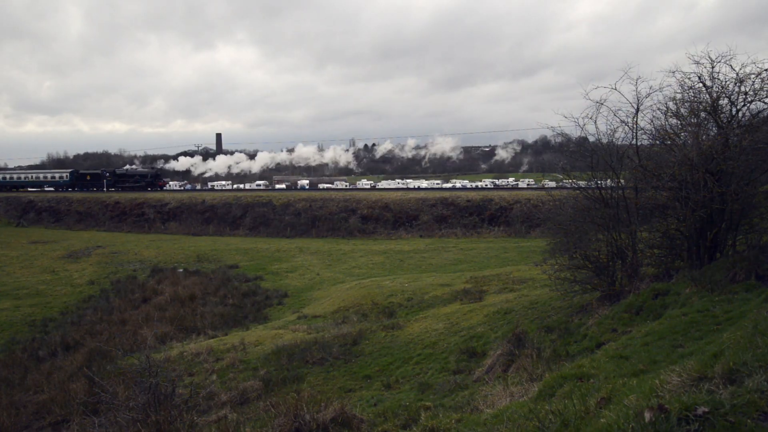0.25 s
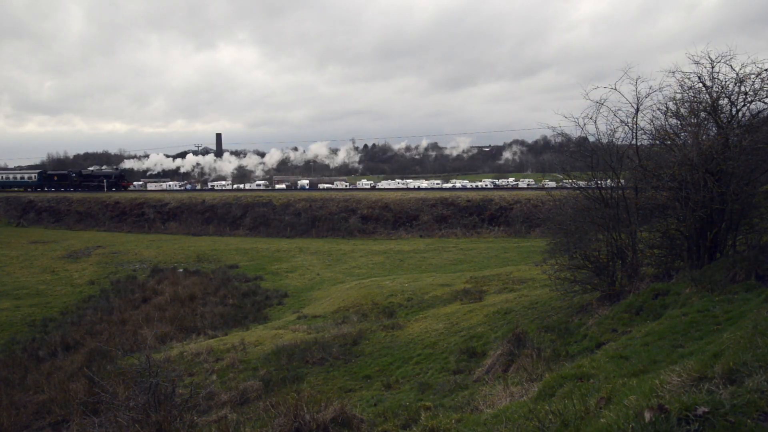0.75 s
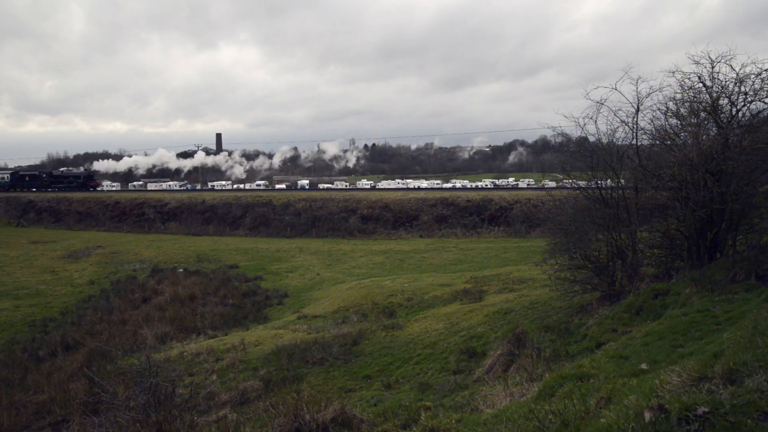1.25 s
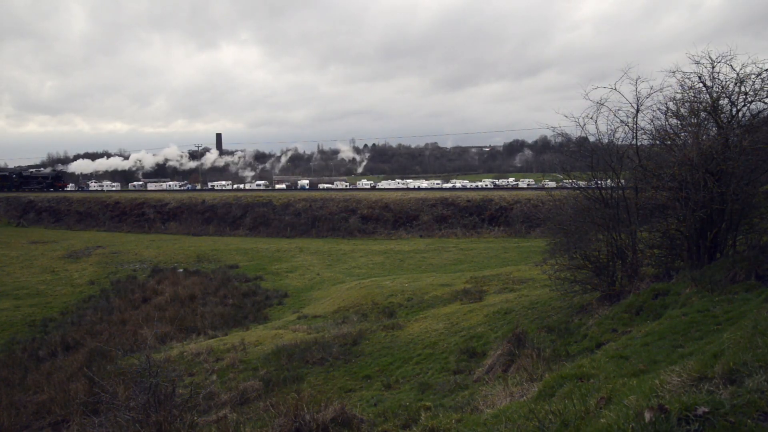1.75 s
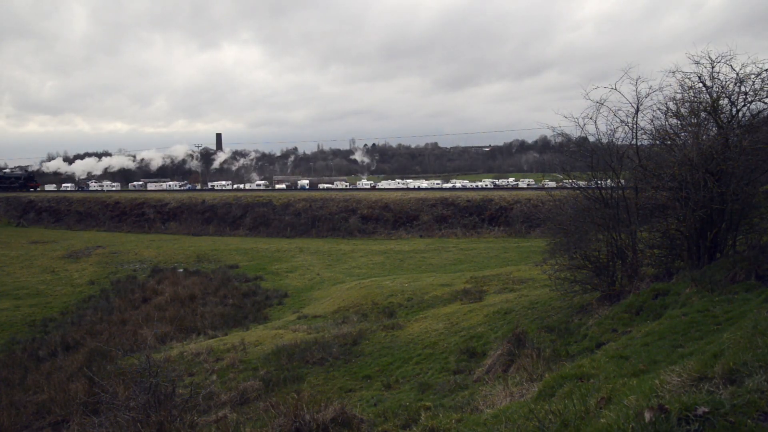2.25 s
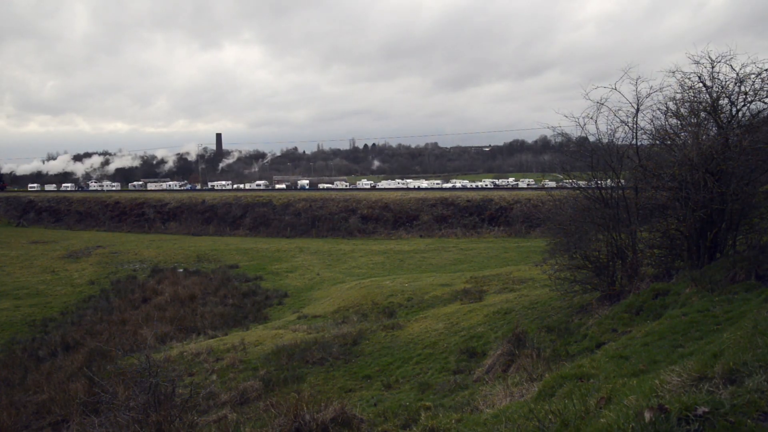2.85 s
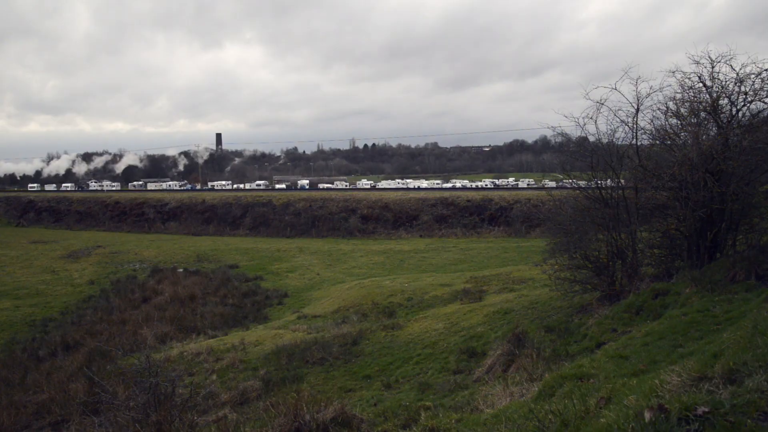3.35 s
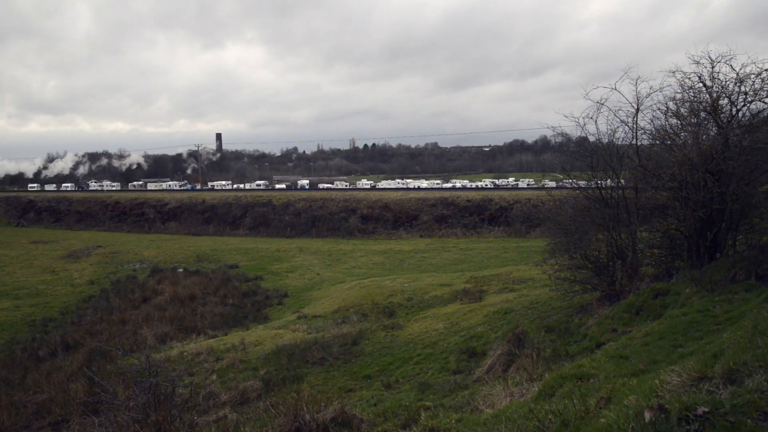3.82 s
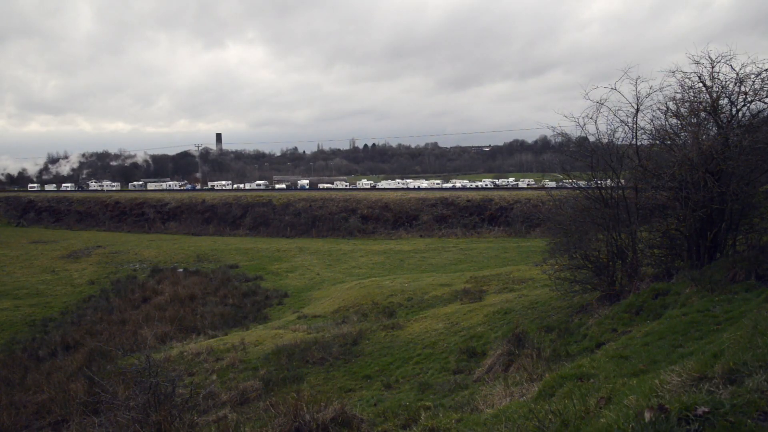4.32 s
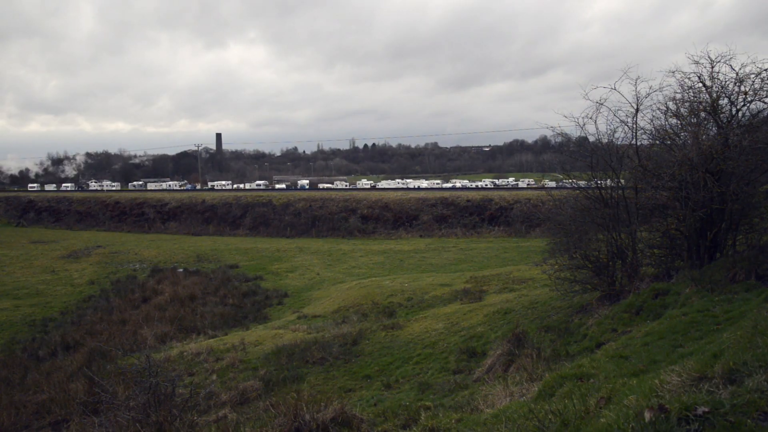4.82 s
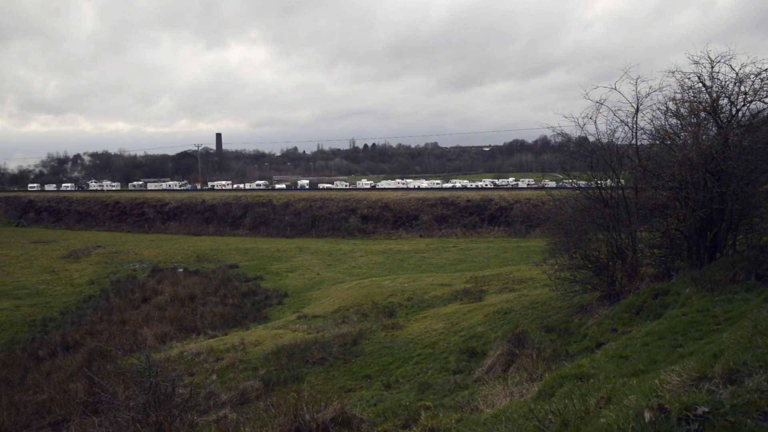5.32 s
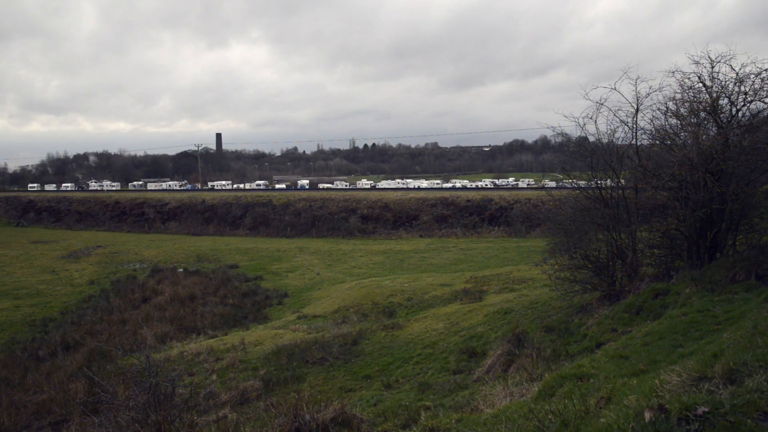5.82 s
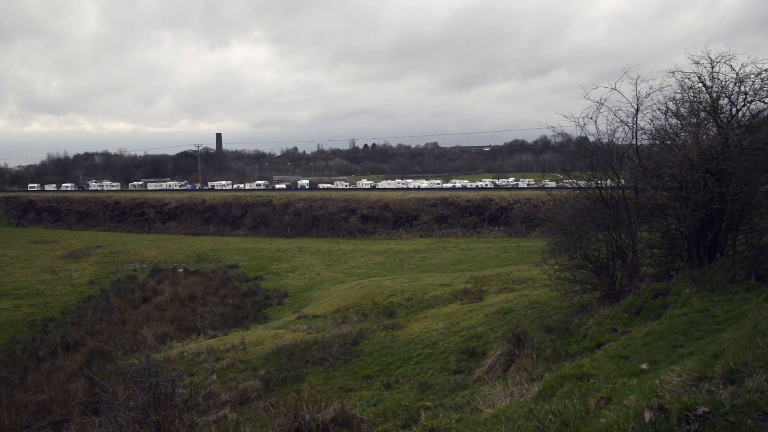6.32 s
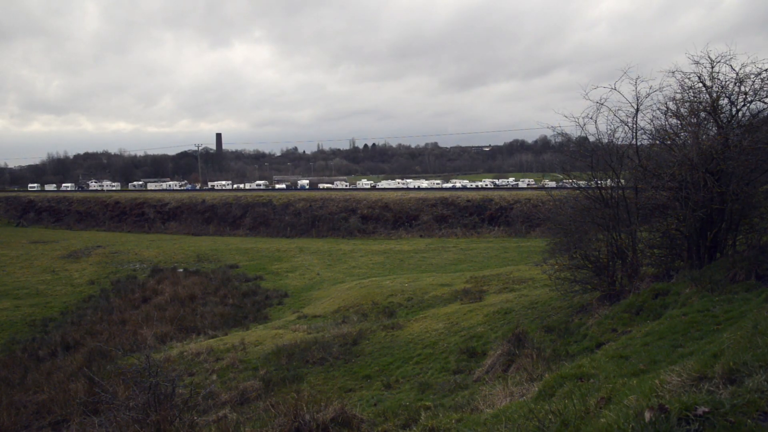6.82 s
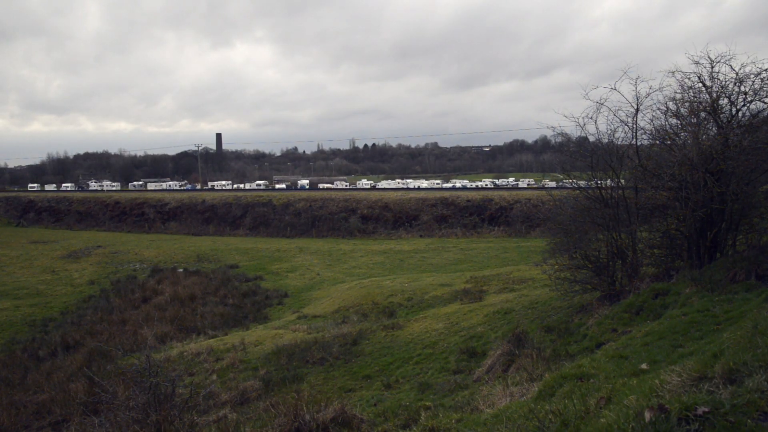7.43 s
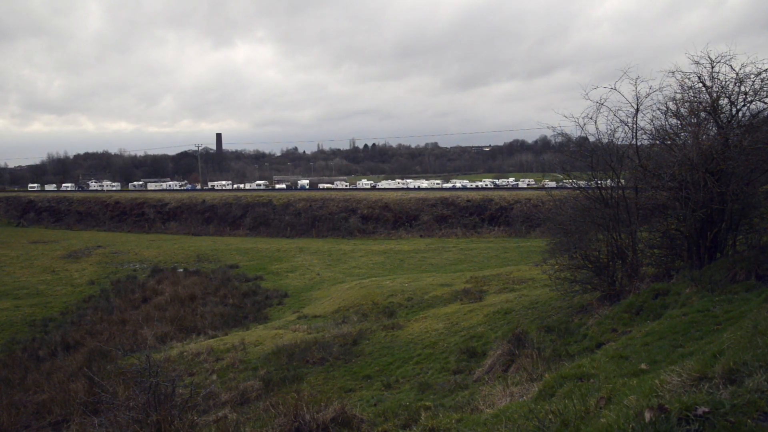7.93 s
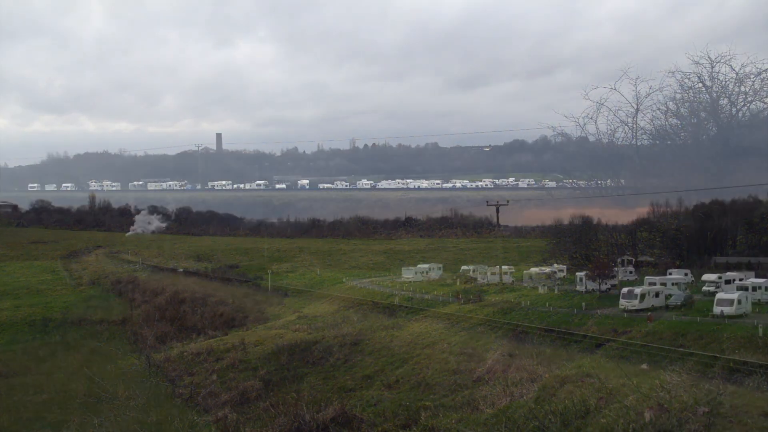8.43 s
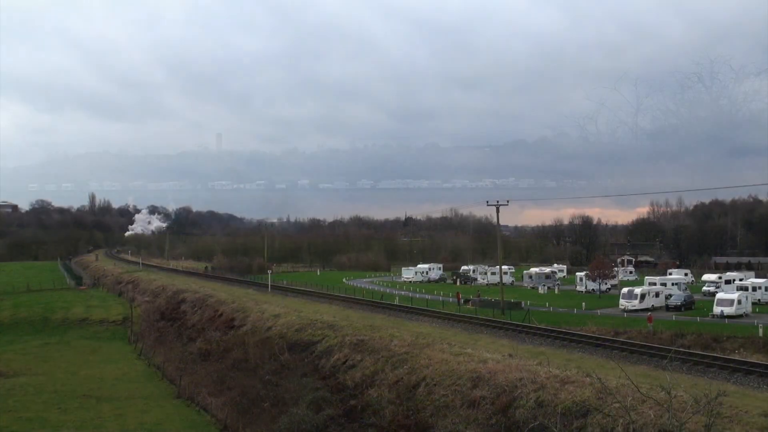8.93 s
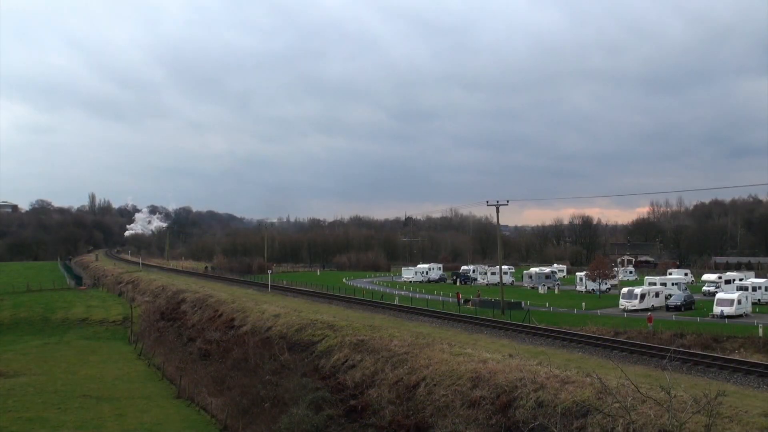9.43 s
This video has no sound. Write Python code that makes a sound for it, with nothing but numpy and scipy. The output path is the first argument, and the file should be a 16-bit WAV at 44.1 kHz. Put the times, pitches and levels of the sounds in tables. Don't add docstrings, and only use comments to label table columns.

```python
import sys
import numpy as np
from scipy import signal
from scipy.fft import rfft, irfft, next_fast_len
from scipy.io import wavfile
from scipy.ndimage import uniform_filter1d

SR = 44100
rng = np.random.default_rng(int(sys.argv[2]) if len(sys.argv) > 2 else 0)


def inscribe(sig):
    pcm = np.round(np.clip(np.atleast_2d(sig).T, -1, 1) * 32767)
    wavfile.write(sys.argv[1], SR, pcm.astype(np.int16))


def invert_db(level):
    return 10 ** (np.asarray(level, dtype=float) / 20)


N = 426447
T = np.arange(N) / SR

# (time [s], level [dB])
GAIN_CURVE = [(0.0, -1), (0.4, 2.5), (1.04, 1.5), (1.42, 2), (1.93, 6.5), (2.35, 8), (2.81, 5.5),
              (3.96, 9.5), (4.34, 8.5), (4.74, 12), (5.19, 6.5), (5.6, 10), (5.85, 1), (6.21, 6),
              (6.55, 9.5), (7.1, -1), (7.69, 11.5), (8.5, 12.5)]
ROAR_DB, RECEDE_DB_PER_S = -23.5, 1.96
WARM_DB, WARM_DB_PER_S = -7.5, 0.3456
HISS_DB, HISS_FOLLOW = -74.5, 0.91
CUT_S, CUT_LENGTH_S, CUT_DB, CUT_WARM_DB, CUT_HISS_DB = 8.498, 0.56, -37.5, 17, -32

# (frequency [Hz], density [dB per Hz])
ROAR_SPECTRUM = [(35, -22.5), (60, 8.5), (189, -3), (322, -12.5), (363, -5.5), (400, -29.5), (433, -7),
                 (528, -8.5), (583, -0.5), (849, -5), (1540, -9), (1950, -6.5), (4470, -21.5), (5030, -22),
                 (6770, -39.5), (8800, -67), (14900, -120)]
# (frequency [Hz], width [Hz], level [dB], time its coach is heard best [s])
WHEEL_MODES = [(827, 130, -7.5, 1.2), (980, 80, -10, 2.5), (1170, 31, -17, 6.6), (1331, 90, -13, 1),
               (1945, 80, -15.5, 3.7), (2647, 570, -13.5, 3.1), (3543, 250, -19, 2.9),
               (5410, 1230, -20.5, 0.85)]
# (time [s], blow level [dB], ring frequency [Hz])
DULL_CHUFFS = [(0.1176, -2.5, 1386), (0.6081, -5, 1970), (1.0701, -11, 970), (1.3277, -6.5, 1940),
               (1.9489, -7, 810), (2.1194, -3.5, 830), (2.4575, -2, 1290), (2.6974, -0.5, 1875),
               (2.8554, -1, 1920), (3.014, -4, 1890), (3.249, 1, 1010), (3.4153, -1.5, 910),
               (3.5682, -3.5, 1855), (3.6915, -2, 1990), (3.73, -24, 706), (3.8286, -0.5, 1664),
               (4.9145, -11, 1640), (5.3986, -8.5, 1157), (6.828, -15.5, 760), (7.6923, -10.5, 1750)]
# (time [s], blow level [dB], ring frequency [Hz], ring re blow [dB])
RINGING_CHUFFS = [(0.1504, -7.5, 846, 0), (0.3042, -11, 700, 2), (0.4579, -9, 840, 1), (0.6865, -6, 800, 0),
                  (0.848, -8.5, 690, 5), (0.9945, -13, 820, -1), (1.109, -7, 764, -1.5),
                  (1.2457, -6.5, 782, 0.5), (1.4833, -6.5, 930, -9), (2.2817, -1, 1470, -10),
                  (2.5475, -6, 685, -2.5), (2.7387, -10.5, 1330, 3.5), (3.5278, -6, 1066, -5),
                  (3.949, -7.5, 1220, -4.5), (4.0606, -10.5, 1000, -0.5), (4.1486, -4.5, 1360, -0.5),
                  (4.6878, -5, 920, -2.5), (5.1449, -8, 1270, 0.5), (5.5665, -5.5, 1004, -6),
                  (5.7322, -15.5, 1016, 1.5), (5.9768, -19.5, 900, 6), (6.151, -16.5, 873, 3.5),
                  (6.1998, -22, 853, 6), (6.3065, -16, 996, -0.5), (6.4295, -13, 1013, 5.5),
                  (6.578, -14.5, 1010, 6), (7.893, -8, 1170, -6.5), (8.1412, -10.5, 1180, -2),
                  (8.31, -17, 2085, 1.5), (8.4885, -14.5, 1170, -5.5)]
KNOCK_RING_DB, KNOCK_RISE_MS, CLACK_RISE_MS = -12.5, 2, 2.6
BLUR_MS_PER_S = 0.45

# (crest time [s], half length [s], level [dB], small fast eddies re slow [dB])
GUST_EVENTS = [(0.416, 0.073, -18, -7), (0.247, 0.081, -19, -15), (0.697, 0.028, -21, -12),
               (.89, 0.078, -25.5, 3.5), (1.044, 0.03, -18.5, -3), (1.485, 0.11, -19.5, -5.5),
               (1.9, .3, -29, -6), (2.898, .02, -17.5, -26), (3.262, 0.075, -19, -13),
               (4.334, 0.073, -15.5, -26), (4.8, 0.02, -10, -5), (5.07, 0.26, -17.5, -5.5),
               (5.37, 0.048, -16, -13), (5.508, 0.034, -15.5, -27), (5.658, 0.077, -11, -9),
               (5.827, 0.074, -14, 2.5), (6.059, 0.024, -14, -4), (6.28, 0.069, -15.5, -2.5),
               (6.66, 0.077, -15.5, 1.5), (6.816, 0.1, -18, -24), (6.964, 0.063, -16, 1.5),
               (7.113, 0.031, -15, 1.5), (7.345, 0.13, -15, -5), (7.647, 0.075, -15, -18),
               (7.792, 0.13, -24, -21), (7.96, 0.019, -11.5, -10), (8.126, 0.056, -13, -15),
               (8.26, 0.021, -36, -19), (8.6, 0.053, -24, -3.5), (8.744, 0.027, -24, -3.5)]
LULL_DB, LULL_FAST_DB, SHELTER_S = -31, -30, 8.9
# (peak time [s], peak level [dB], frequency [Hz])
HARD_EDDIES = [(0.003, -9.5, 193), (0.41, -18, 245), (0.446, -7, 368), (0.894, -2, 390), (0.916, 2, 361),
               (1.43, -6, 290), (1.451, -3, 300), (3.199, -4, 200), (4.797, -8.5, 239), (4.906, -1.5, 420),
               (4.967, 0, 269), (4.974, -8, 414), (5.229, 1, 318), (5.248, -1.5, 450), (5.264, -3, 380),
               (5.292, -3.5, 366), (5.339, -7.5, 314), (5.37, 0.5, 356), (5.77, -1.5, 172), (5.979, 2, 380),
               (6.215, -4.5, 186), (6.48, -2, 320), (6.49, -2, 310), (6.829, -2.5, 178), (7.019, -3, 334),
               (7.26, -0.5, 269), (7.448, -1.5, 285), (8.154, -11.5, 251), (8.245, -5, 172),
               (8.625, -10, 300)]
# (peak time [s], peak level [dB], frequency [Hz], ducking [dB])
OVERLOAD_EDDIES = [(0.906, -6, 237, 12), (1.115, -2, 228, 3.5), (2.972, 0.5, 272, 11),
                   (3.257, -0.5, 318, 13.5), (4.786, -21.5, 234, 11.5), (5.171, -1.5, 280, 17.5),
                   (5.64, -13, 143, 11), (5.837, -7, 328, 10.5), (6.005, 1, 243, 6), (6.078, -5, 260, 8),
                   (6.337, 0.5, 292, 6), (6.659, 4.5, 420, 5.5), (6.697, 0, 383, 8.5),
                   (6.886, -4, 105, 7.5), (6.941, 2.5, 262, 0), (7.112, 2, 334, 0), (7.596, -3.5, 155, 5.5),
                   (8.561, -8, 186, 14), (8.74, -10, 307, 9)]

# (frequency [Hz], density [dB per Hz])
RUMBLE_SPECTRUM = [(12, -21.5), (22, 8), (38, -12.5), (55, 2), (90, -6.5), (130, -24.5), (180, -20),
                   (250, -37), (400, -44.5), (1000, -59), (4000, -93.5), (8800, -120)]
# (time [s], level [dB])
RUMBLE_CURVE = [(0.0, -23), (1.2, -33), (1.7, -27), (3.3, -38), (4.3, -30.5), (6.1, -27), (7.2, -35),
                (8.2, -23.5), (8.498, -17), (8.63, -9), (8.754, -10), (9.038, -1.5), (9.28, -2),
                (9.56, -5.5), (9.62, -1.5)]
RUMBLE_FOLLOW = 0.14

# (time [s], half length [s], level [dB])
HEDGE_GUSTS = [
    (0.44, 0.3, -50),
    (1.356, 0.1, -55),
    (2.4, 0.4, -61.5),
    (3.544, 0.15, -52),
    (4.673, 0.18, -52),
    (4.877, 0.11, -50.5),
    (6.602, .07, -55.5),
    (8.1, 0.3, -71.5),
]
# (time [s], frequency [Hz], level [dB])
BIRD_CHIRP = [
    (9.594, 3900, -61),
    (9.603, 4150, -69),
    (9.608, 4200, -63),
    (9.614, 3950, -67),
    (9.63, 3850, -76),
]


def evened(x):
    return x / np.sqrt(np.mean(x ** 2) + 1e-20)


def steadied(x, span):
    return x / np.sqrt(uniform_filter1d(uniform_filter1d(x ** 2, span), span))


def curves(rows):
    s, *columns = np.transpose(rows)
    return [np.interp(T, s, c) for c in columns]


def coloured(x, points):
    f, db = np.transpose(points)
    size = next_fast_len(len(x))
    hz = np.fft.rfftfreq(size, 1 / SR)
    gain = invert_db(np.interp(np.log(hz + 1), np.log(f + 1), db))
    return irfft(rfft(x, size) * gain, size)[:len(x)]


def band(x, lo_hz, hi_hz):
    return signal.sosfilt(signal.butter(3, [lo_hz, hi_hz], "band", fs=SR, output="sos"), x)


def drift(span_s):
    size = max(round(span_s * SR / 16), 2)
    noise = rng.standard_normal(N // 16 + 1)
    slow = uniform_filter1d(uniform_filter1d(noise, size), size)
    return evened(np.interp(T, np.arange(len(slow)) * 16 / SR, slow))


def resonate(x, hz, width):
    b, a = signal.iirpeak(hz, hz / (1.08 * width), SR)
    return signal.lfilter(b, a, signal.lfilter(b, a, x))


def add(mix, s, sound):
    part = mix[max(round(s * SR), 0):][:len(sound)]
    part += sound[:len(part)]


def ducking():
    down_db = np.zeros(N)
    for s, *_, db in OVERLOAD_EDDIES:
        add(down_db, s + 0.0015, db * np.exp(-T[:SR] / 0.069))
    return invert_db(-uniform_filter1d(down_db, 130))


def levels():
    gain_db = curves(GAIN_CURVE)[0]
    cut = np.clip((T - CUT_S) / CUT_LENGTH_S, 0, 1)
    roar_db = ROAR_DB + gain_db - RECEDE_DB_PER_S * np.minimum(T, CUT_S) + CUT_DB * cut
    warm_db = WARM_DB + WARM_DB_PER_S * T + CUT_WARM_DB * cut ** 2
    hiss_db = HISS_DB + HISS_FOLLOW * gain_db + CUT_HISS_DB * cut
    return roar_db, warm_db, hiss_db


def gusts():
    t = T[::64]
    lull = ducking()[::64] * np.clip((CUT_S + 0.18 - t) / 0.077, .03, 1)
    slow, fast = (lull * invert_db(LULL_DB)) ** 2, (lull * invert_db(LULL_FAST_DB)) ** 2
    for s, half_s, db, fast_db in GUST_EVENTS:
        power = invert_db(db) ** 2 * np.exp(-2 * ((t - s) / half_s) ** 2)
        slow = slow + power
        fast = fast + power * invert_db(fast_db) ** 2
    return np.interp(T, t, np.sqrt(slow)), np.interp(T, t, np.sqrt(fast))


def roar():
    level_db, warm_db, _ = levels()
    wide = coloured(rng.standard_normal(N) * invert_db(1.1 * drift(0.025)), ROAR_SPECTRUM)
    wide /= np.std(band(wide, 1600, 6000))
    for hz, width, db, best_s in WHEEL_MODES:
        near_db = 5 * np.exp(-((T - best_s) / 1.56) ** 2)
        mode = evened(resonate(rng.standard_normal(N), hz, width))
        wide += invert_db(db + near_db + 3.8 * drift(0.042)) * mode
    low = signal.sosfiltfilt(signal.butter(2, 1250, fs=SR, output="sos"), wide)
    return invert_db(level_db) * (wide + (invert_db(warm_db) - 1) * low)


def hiss():
    spectrum = [(300, -33), (3000, 1.5), (10000, -7.0), (16000, -4.0)]  # (frequency [Hz], level [dB])
    noise = evened(coloured(rng.standard_normal(N), spectrum))
    return (ducking() * invert_db(levels()[2] + 5.0) + invert_db(-72.5)) * noise


def rumble():
    swings = steadied(coloured(rng.standard_normal(N), RUMBLE_SPECTRUM), 6000)
    gust = np.where(T < CUT_S, gusts()[0] / invert_db(-26.5), 1) ** RUMBLE_FOLLOW
    return 1.3 * np.tanh(invert_db(curves(RUMBLE_CURVE)[0] - 1.5) * gust * swings / 1.71)


def eddy(hz, turns):
    u = np.arange(-turns / 2, turns / 2, hz / SR)
    return -np.cos(2 * np.pi * u + .5) * abs(np.cos(np.pi * u / turns)) ** 1.94


def eddies(per_s, lo_hz, hi_hz, spread_db, tilt_db):
    out = np.zeros(N)
    for hz in np.geomspace(lo_hz, hi_hz, num=6):
        hits = (rng.random(N) < per_s / 6 / SR) * rng.choice([-1, 1], N)
        sizes = invert_db(spread_db * np.minimum(rng.exponential(1, N), 3.5))
        shape = invert_db(tilt_db * np.log2(hz / lo_hz)) * eddy(hz, 2.474)
        out += signal.oaconvolve(hits * sizes, shape)[:N]
    return out / np.sqrt(uniform_filter1d(uniform_filter1d(out ** 2, 1200), 1200) + 1e-3)


def buffeting():
    slow, fast = gusts()
    both = slow * eddies(700, 120.3, 358, 1.6, -1.0) + fast * eddies(1200, 309.5, 1385, 2.7, -4.0)
    sheltered = np.clip((SHELTER_S - T) / .08, 0, 1)
    clumps = invert_db(2.3 * drift(0.02))
    return 0.8 * np.tanh(invert_db(-1.0) * clumps * both / 0.72) * sheltered


def pops():
    out = np.zeros(N)
    for s, db, hz, *_ in HARD_EDDIES + OVERLOAD_EDDIES:
        add(out, s - 1.806 / 2 / hz, invert_db(db) * eddy(hz, 1.385))
        add(out, s, invert_db(1.6 * db - 37.5) * np.array([1., -1.]))
    return out


def clacks():
    out, t = np.zeros(N), T[:8192]
    knocks = [(*k, KNOCK_RING_DB, KNOCK_RISE_MS) for k in DULL_CHUFFS]
    rows = sorted(knocks + [(*c, CLACK_RISE_MS) for c in RINGING_CHUFFS])
    for s, db, hz, ring_db, rise_ms in rows:
        noise = rng.standard_normal(8192)
        rise = 1 - np.exp(-1000 * t / np.clip(rise_ms + BLUR_MS_PER_S * s, .8, 25))
        blow = coloured(signal.lfilter([1, -.9], 1, noise), ROAR_SPECTRUM)
        blow = evened(blow) * (invert_db(-60 * t / 0.086) + invert_db(-10.0 - 60 * t / .5))
        beat_hz = 45 + 12 * noise[0]
        pair = np.sin(2 * np.pi * hz * t) + 0.29 * np.sin(2 * np.pi * (hz + beat_hz) * t)
        back = noise[::-1]
        rough = evened(resonate(back, hz, 250) + 0.46 * resonate(back, 1.317 * hz, 260))
        ring = invert_db(ring_db - 1.5 - 60 * t / 0.14) * (1.1 * pair + 2.43 * rough)
        add(out, s - .002, invert_db(db - 9.0) * rise * (blow + ring))
    return out


def rustle():
    swell = sum(invert_db(db) * np.exp(-((T - s) / half_s) ** 2) for s, half_s, db in HEDGE_GUSTS)
    grain = rng.standard_normal(N) * invert_db(2.3 * drift(.004))
    spectrum = [(5000, -11.5), (7500, 3.0), (10000, -14.5), (13000, -21.0)]  # (frequency [Hz], level [dB])
    return swell * evened(coloured(grain, spectrum))


def bird():
    hz, db = curves(BIRD_CHIRP)
    sounding = (T > BIRD_CHIRP[0][0]) * (T < BIRD_CHIRP[-1][0])
    return invert_db(db) * np.sin(2 * np.pi * np.cumsum(hz) / SR) * sounding


def scene():
    wind = buffeting() + pops() + rumble()
    return (ducking() * (roar() + rustle()) + hiss() + clacks() + wind + bird())[None]


def roll_off(x):
    return signal.sosfilt(signal.butter(12, 15800, fs=SR, output="sos"), x)


def record(dry):
    over = np.maximum(abs(dry) - .7, 0)
    rounded = dry - np.sign(dry) * (over - .34 * np.tanh(over / .34))
    return roll_off(np.clip(rounded, -.99, .99))


dry = scene()
out = record(dry)
inscribe(out)
```